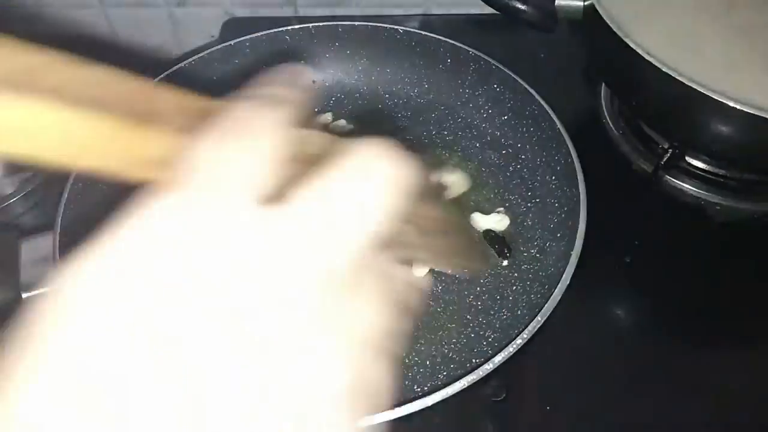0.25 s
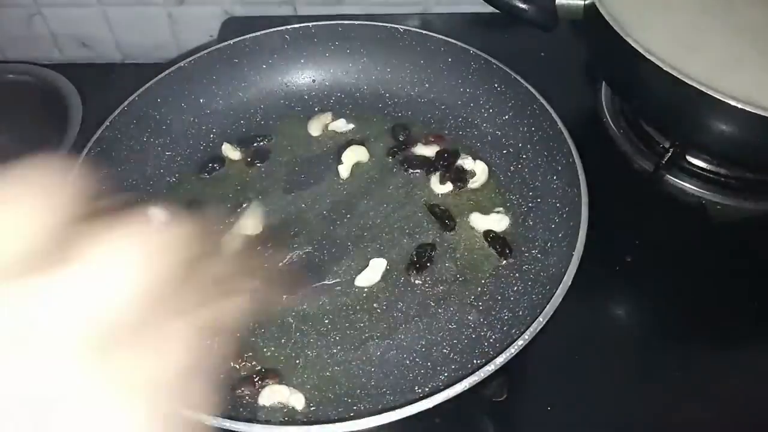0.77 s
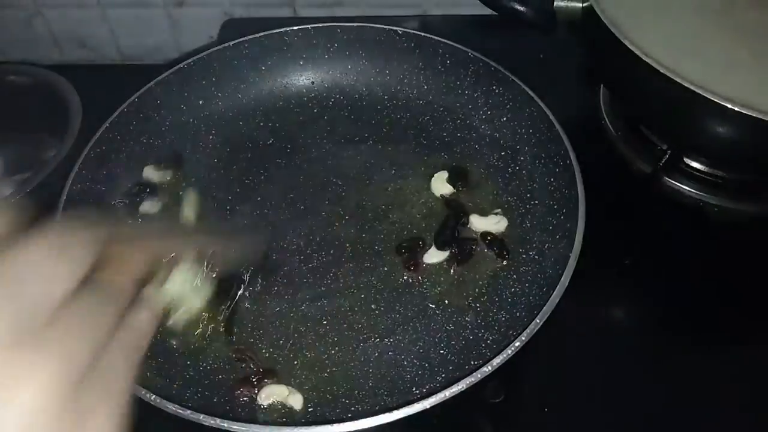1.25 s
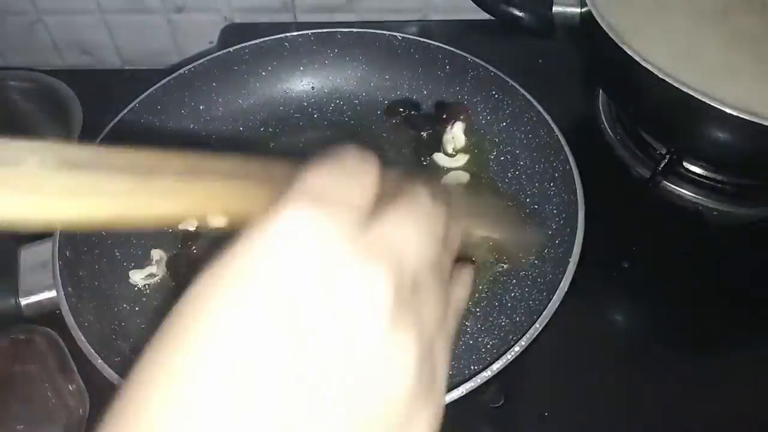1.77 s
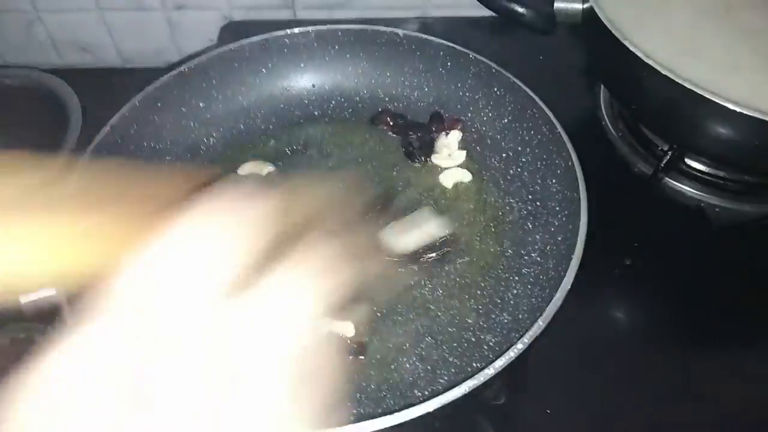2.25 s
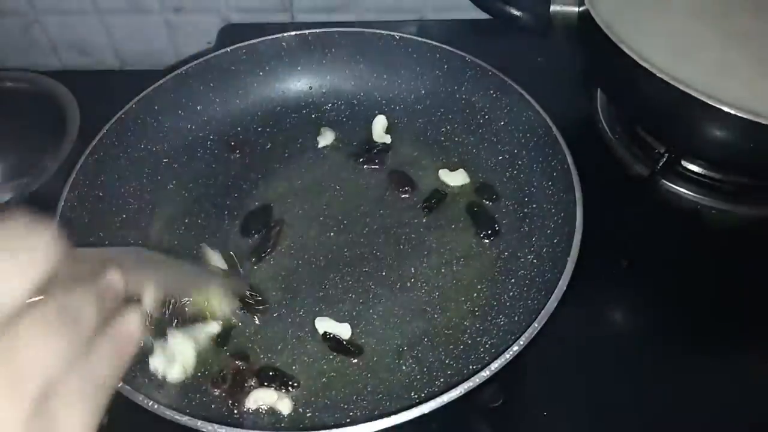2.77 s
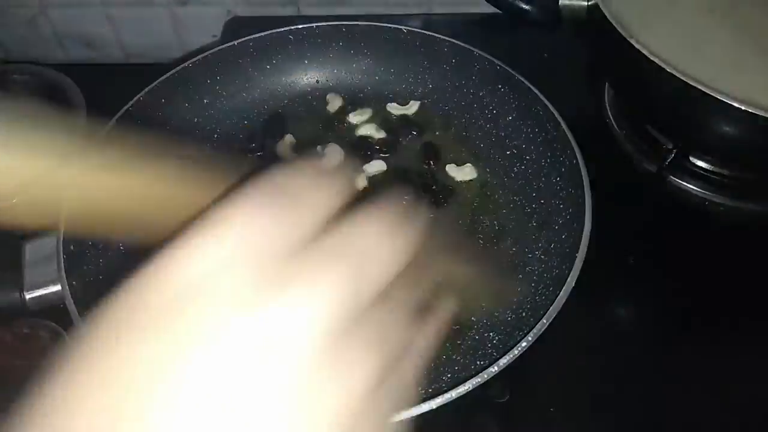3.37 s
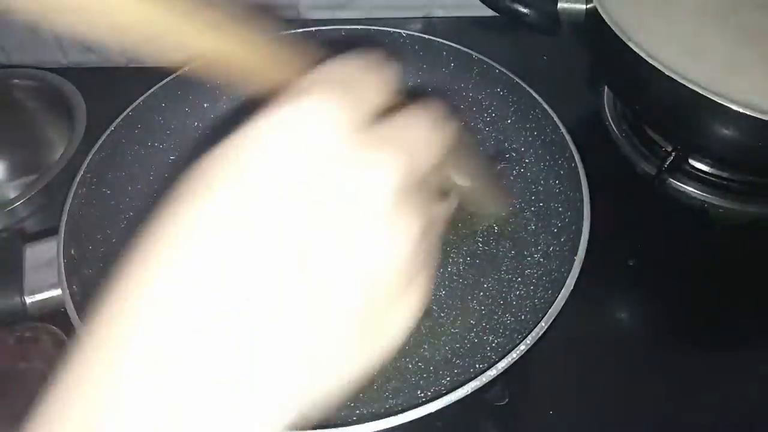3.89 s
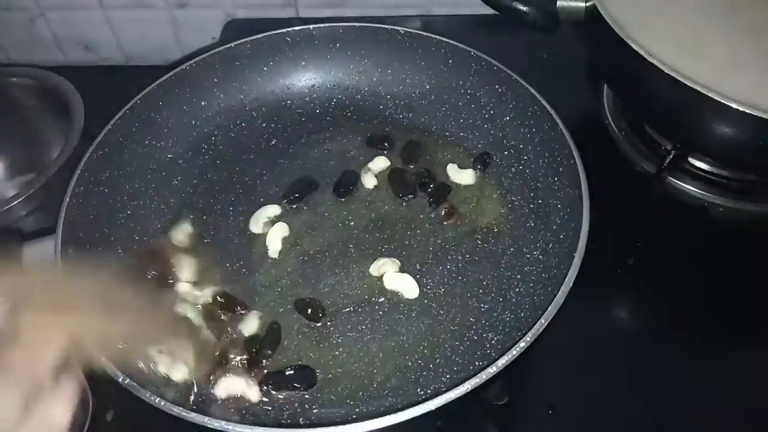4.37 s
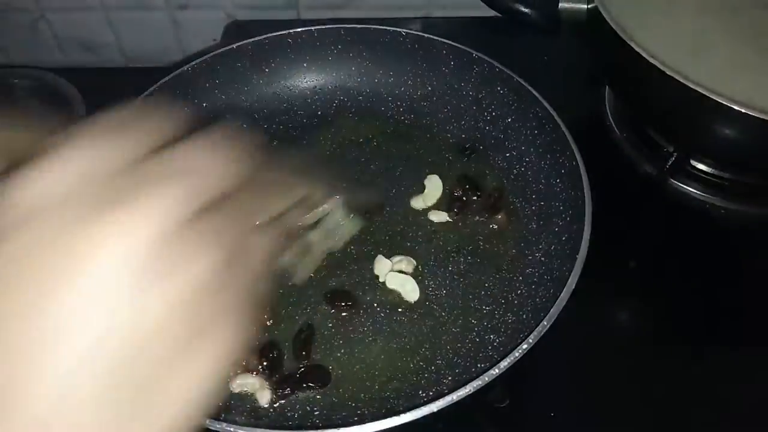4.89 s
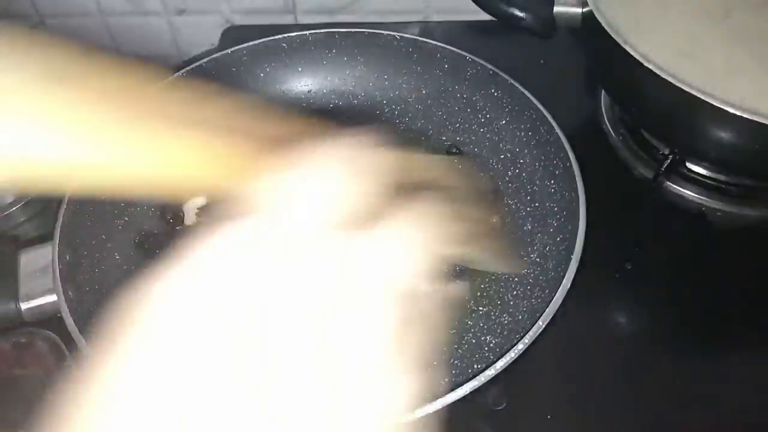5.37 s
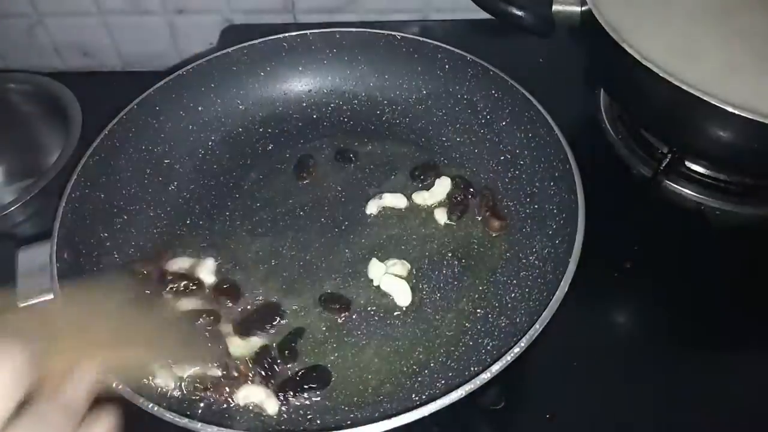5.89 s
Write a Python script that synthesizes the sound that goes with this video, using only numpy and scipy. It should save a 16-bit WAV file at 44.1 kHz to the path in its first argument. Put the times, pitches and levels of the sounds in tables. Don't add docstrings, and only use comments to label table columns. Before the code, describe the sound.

Close mono sound of nuts and raisins frying in hot fat: a continuous crisp crackle with loud bubble pops. Every half second or so a wooden spatula knocks the pan, giving short, low-mid, quickly damped clunks, followed by brief scrapes and rattling nuts. Stirring pauses around five seconds, then resumes with more knocks. A low burner hum and a small kitchen echo lie beneath.

```python
import sys
import numpy as np
from scipy import signal
from scipy.fft import rfft, irfft
from scipy.io import wavfile
from scipy.ndimage import uniform_filter1d

SR = 44100
rng = np.random.default_rng(int(sys.argv[2]) if len(sys.argv) > 2 else 0)


def materialize(psi):
    bounded = np.clip(np.atleast_2d(psi).T, -1, 1)
    quanta = np.round(bounded * 32767).astype(np.int16)
    wavfile.write(sys.argv[1], SR, quanta)


def volts_from_db(level):
    exponent = np.asarray(level, float) / 20
    return 10 ** exponent


N = 270774


def evened(x):
    return x / np.sqrt(np.mean(x ** 2) + 1e-20)


def read(points, hz):
    f, value = np.transpose(points)
    return np.interp(np.log(hz + 1), np.log(f + 1), value)


def add(mix, s, sound):
    part = mix[round(s * SR):][:len(sound)]
    part += sound[:len(part)]


def band(x, low_hz, high_hz):
    return signal.sosfilt(signal.butter(2, [low_hz, high_hz], "bandpass", fs=SR, output="sos"), x)


def drift(size):
    once = uniform_filter1d(rng.standard_normal(N), size=size)
    return evened(uniform_filter1d(once, size=size))


def click_of(points, size=4096, floor_db=-90):
    gain_db = np.maximum(read(points, abs(np.fft.fftfreq(size, 1 / SR))), floor_db)
    click = np.fft.ifft(np.exp(np.conj(signal.hilbert(np.log(volts_from_db(gain_db)))))).real
    return click[:size // 2] / abs(click).max()


def coloured(x, points):
    return evened(signal.oaconvolve(x, click_of(points))[:N])


def bursts(per_s, spread_db, clump_db):
    size = volts_from_db(spread_db * np.minimum(rng.exponential(1, N), 5)) * rng.choice([-1, 1], N)
    happens = rng.random(N) < per_s / SR
    return evened(size * happens * volts_from_db(clump_db * drift(500)))


def swells(s, db, held, rise, fall, rest_db=-120):
    t = np.arange(0, N / SR + .002, .001)[:, None]
    early, late = np.maximum(s - t, 0), np.maximum(t - s - np.abs(held), 0)
    each_db = db - rise * early - fall * late
    gain = np.sqrt((volts_from_db(each_db) ** 2).sum(1) + volts_from_db(rest_db) ** 2)
    return np.interp(np.arange(N) / SR, t[:, 0], gain)


def ringing(modes, free=1, spot_db=0, rise=1e-4):
    hz, db, t60 = np.transpose(modes)[:, :, None]
    t = np.arange(SR // 2) / SR
    partials = volts_from_db(db + spot_db - 60 * t / (t60 * free)) * np.sin(2 * np.pi * hz * t)
    return partials.sum(0) * (1 - np.exp(-t / rise))


# [f/Hz, level/dB]
HUM = [(20, -90), (60, -70), (100, -57), (200, -74), (270, -16), (310, -3.5), (410, -2.5), (560, -6),
       (800, -9.5), (1200, -11), (1600, -12), (3000, -71)]
# [t/s, shake of the stove top/dB, low rolling of the load/dB]
SHOVES = [(.07, -50, -59), (.43, -51, -36.5), (1.045, -50, -37.5), (1.8, -47, -38), (2.29, -48, -36),
          (3.0, -64, -38.5), (3.35, -59, -53), (4.0, -52, -32.5), (4.89, -46, -38), (5.47, -41, -39),
          (5.65, -61, -43), (6.0, -48, -64)]


def burner():
    noise = rng.standard_normal((2, N))
    roar = irfft(rfft(noise[0]) * volts_from_db(read(HUM, np.fft.rfftfreq(N, 1 / SR))), N)
    rumble = band(band(noise[1], 156, 290), 93, 197)
    s, shake_db, _ = np.transpose(SHOVES)
    shaking = swells(s, shake_db - 4.5, 0, rise=970, fall=190, rest_db=-72)
    return volts_from_db(-38.5) * evened(roar) + shaking * evened(rumble)


# [t/s, crackle level/dB, fine spray level against it/dB]
FRYING = [(0, -27.5, -24), (.2, -27.5, -20), (.31, -30, -23), (.52, -28, -21), (.9, -27.5, -21),
          (1.0, -29.5, -20.5), (1.3, -25, -21.5), (1.6, -27, -22), (2.0, -25.5, -21), (2.14, -29.5, -20.5),
          (2.62, -27, -21), (2.92, -29, -21.5), (3.45, -26, -18.5), (4.55, -25, -20.5), (4.73, -28, -19),
          (4.95, -24.5, -21), (5.45, -28.5, -20), (5.8, -24, -19.5)]
# [t/s, crackle level/dB, spray level/dB, seethe level/dB]
SPLASHES = [(.012, -44, -62, -56), (.146, -29, -53, -42), (.525, -26.5, -60, -55), (1.052, -32, -51, -50),
            (1.262, -27, -58, -34.5), (1.395, -46, -53, -54), (1.525, -23.5, -64, -57),
            (1.802, -37, -64, -37.5), (2.262, -22.5, -60, -37), (2.53, -42, -60, -49),
            (2.63, -40, -56, -45), (2.71, -45, -50, -43), (2.83, -28, -64, -43), (2.972, -30, -62, -48),
            (3.335, -28, -58, -46), (3.47, -25, -60, -55), (3.62, -39, -60, -42), (3.82, -40, -51, -61),
            (3.96, -27, -60, -55), (3.984, -31, -60, -41), (4.16, -27, -54, -35), (4.52, -39, -60, -55),
            (4.63, -25, -60, -47), (5.29, -25, -50, -58), (5.478, -28, -56, -37), (5.64, -24.5, -60, -57),
            (5.69, -25.5, -51, -38), (5.73, -44, -58, -36), (5.98, -32, -65, -55), (6.12, -71, -57, -42.5)]
# [f/Hz, level/dB]
CRACKLE = [(1530, -65), (2600, -20), (2720, -19.5), (3130, -22.5), (3550, -16), (3800, -8.5), (4900, -5),
           (5700, 0.5), (6560, -4), (7700, -26), (9000, -27), (11700, -54), (19800, -120)]
# [f/Hz, level/dB]
SPRAY = [(5000, -22), (7500, 4.5), (8600, 4.5), (10500, -2.5), (12000, -2), (13000, 2), (13200, -3),
         (13900, -4), (14400, 4), (15000, 8.5), (15700, 6), (17000, -80)]
# [f/Hz, level/dB]
SEETHE = [(530, -27.5), (900, 0), (1150, -11.5), (1710, -2.5), (1860, -3), (2020, -1.5), (2960, -8),
          (3600, -4), (4680, -21.5), (7920, -120)]


def frying():
    s, *controls = np.transpose(FRYING)
    vigour_db, fine_db = (np.interp(np.arange(N) / SR, s, c) for c in controls)
    seethe_db = -41.5 + 0.18 * (vigour_db + 20)
    steady_db = (vigour_db, vigour_db + fine_db - 6.0, seethe_db)
    s, *splash_db = np.transpose(SPLASHES)
    crackling, spraying, seething = (np.hypot(volts_from_db(steady), swells(s, db, 0, rise=250, fall=127))
                                     for steady, db in zip(steady_db, splash_db))
    swarm = bursts(per_s=7500, spread_db=-2.5, clump_db=0.6)
    shared = 1.08 * swarm + 0.46 * bursts(per_s=5400, spread_db=4.0, clump_db=-1.0)
    fine = np.zeros(N)
    for low_hz, high_hz in [(5000, 10500), (10500, 13700), (13700, 20000)]:
        own = bursts(per_s=4300, spread_db=0.5, clump_db=2.5)
        fine += band(shared + own, low_hz, high_hz)
    dull = swarm + bursts(per_s=2000, spread_db=1.5, clump_db=-0.5)
    crackle = crackling * coloured(swarm, CRACKLE)
    spray = spraying * volts_from_db(7.0) * coloured(fine, SPRAY)
    return crackle + spray + seething * volts_from_db(1.5) * coloured(dull, SEETHE)


# [f/Hz, variation/dB]
PATCHY_DB = [(300, 1.5), (1000, 2.3), (3000, 2.1), (4000, .9), (15000, 1.2)]


def patchy(x):
    hz, _, z = signal.stft(x, SR, nperseg=512)
    field = uniform_filter1d(rng.standard_normal(z.shape), size=7, axis=0)
    field = uniform_filter1d(field, size=18, axis=1)
    gain = volts_from_db(read(PATCHY_DB, hz)[:, None] * evened(field))
    return signal.istft(z * gain, nperseg=512)[1][:N]


# [t/s, pressure level/dB, held/s, brightness/dB]
STROKES = [(0, -43, 0.079, -8), (.125, -47.5, 0.066, 2), (.2, -36, 0.015, -14), (.36, -60, 0.042, -11),
           (.458, -32.5, 0.023, -8), (.5, -36.5, 0.046, -4.5), (.62, -66, .4, -7), (1.2, -56, 0.092, 8.5),
           (2.165, -41, 0.037, -7), (2.29, -30, 0.012, -5), (2.33, -52, .02, 0), (3.0, -56, .35, 1),
           (3.42, -43.5, 0.021, 6), (3.47, -38.5, 0.042, 0), (3.515, -49, 0.052, 2.5),
           (4.05, -33.5, 0.095, -8), (4.12, -38, 0.2, -13), (5.58, -33, 0.094, -12), (5.69, -47, 0.04, 8),
           (5.75, -35, 0.036, -8.5)]
# [f/Hz, level/dB, time to fall 60 dB/s]
LOWEST = [(311, -6, .3), (400, -3, .14), (480, -6, .1), (550, -6, .1)]
LOWER = [(585, -12, .1), (630, 0, .26), (660, -1, .22)]
MAIN = [(688, -10, .13), (715, 0, .3), (748, -11, .11)]
UPPER = [(872, -2, .25), (925, 0, .2)]
RIM = [(990, 0, .07), (1030, -4, .06), (1155, -6, .08), (1212, -3, .15), (1328, -2, .27), (1355, -4, .12),
       (1400, -6, .08), (1445, -8, .08)]
# [f/Hz, level/dB, time to fall 60 dB/s]
FLOOR = [(1480, -2, .34), (1720, -5, .15), (1990, -2, .1), (2190, 1, .1), (2600, -4, .07), (2880, -3, .05)]
# [f/Hz, level/dB]
WOOD = [(250, -38.5), (450, 11), (700, 12), (1300, 8.5), (2000, 2.5), (2800, -3), (6000, -37), (9000, -97)]


def scrape():
    s, db, held, bright_db = np.transpose(STROKES)
    pressing = swells(s, db, held, rise=240, fall=750, rest_db=-91)
    rasping = swells(s, db + bright_db, held, rise=240, fall=750, rest_db=-115)
    s, _, roll_db = np.transpose(SHOVES)
    rolling = swells(s + 0.027, roll_db, 0, rise=71, fall=33, rest_db=-50)
    slips = bursts(per_s=2500, spread_db=2.5, clump_db=1.2)
    body = ringing(MAIN, .22) + volts_from_db(-13) * ringing(LOWER + UPPER, .25)
    low, main, upper = (evened(signal.oaconvolve(slips, ring)[:N])
                        for ring in (ringing(LOWEST, 0.99), body, ringing(RIM + FLOOR, .45)))
    bright = upper + volts_from_db(3.0) * coloured(slips, WOOD)
    return rolling * low + pressing * main + rasping * bright


# [t/s, loss/dB]
CHOKES = [(.05, 8), (.183, 5), (.25, 12), (.495, 9), (.74, 8), (1.066, 2), (1.08, 4), (1.113, 4),
          (1.13, 11), (1.84, 4), (1.865, 2), (1.95, 8), (2.19, 6), (2.259, 11), (2.316, 16), (3.1, 8),
          (3.372, 3), (3.385, 5), (3.43, 10), (3.57, 10), (3.997, 6), (4.06, 7), (4.115, 9), (5.482, 2),
          (5.497, 8), (5.53, 5), (5.556, 11), (5.677, 14)]


def choking(s, size):
    touches = [c for c in CHOKES if s < c[0] < s + .3] + [(s, 0)]
    at, loss_db = np.transpose(touches)[:, :, None]
    t = s + np.arange(size) / SR
    settled = np.clip((t - at) / .006, 0, 1)
    return volts_from_db(-(np.abs(loss_db) * settled).sum(0))


# [t/s, peak level/dB, lower notes/dB, upper notes/dB, rim notes/dB]
KNOCKS = [(0.016, -25.5, 0, 7, -10), (.122, -23, -10, -12, -19), (.14, -35, -10, -13, -8),
          (0.164, -18, -18, -5, -8), (.2, -37, -15, 6, -17), (0.418, -22, 7, 10.5, -1),
          (0.423, -12.5, -2.5, -4, -9), (.449, -33, -5, -1, 15), (.466, -40, 25, -4, 0),
          (0.697, -28, -20, 3, -14), (1.051, -4.5, -8.5, -14, -15.5), (1.058, -40, -7, -15, -17),
          (1.795, -3.5, -7, -16, -10.5), (1.803, -26, -4, -5, 11), (1.826, -17, -6, -20, 1),
          (1.879, -35, -8, -17, 9), (2.16, -26, -1, 5, -14), (2.2445, -9.5, -16, 0, -0.5),
          (2.251, -20, 2, 8, -27), (2.264, -16.5, -16, -7, -25), (2.284, -30.5, -10, -12, 10),
          (2.293, -12, -23, -25, -17), (2.972, -33, 11, 15.5, 4), (3.021, -39.5, 18, 13, 8),
          (3.3365, -6.5, -3, -27, -10.5), (3.344, -24, -6, 5, -12), (3.374, -31.5, 20, -14, 13.5),
          (3.41, -39, -4, -20, -17), (3.52, -24, -14, -18, -14), (3.98, -3, -11, -17, -11.5),
          (3.986, -17, -18, -26, -21), (4.019, -18.5, 6.5, -4, -4), (4.098, -45, -11, -15, -9),
          (5.466, -17.5, -12, 0, 1.5), (5.473, -8, -17, -15, -19), (5.511, -36, 13, -20, 15.5),
          (5.658, -21.5, -19, -20, -5), (5.723, -35, -20, 9, -12)]
# [f/Hz, level/dB, time to fall 60 dB/s]
THUMP = [(256, 0, .1)]
# [t/s, f/Hz]
LOADED = [
    (.15, 715),
    (.42, 723),
    (1.05, 721),
    (1.8, 713),
    (2.25, 707),
    (2.3, 716),
    (3.34, 718),
    (3.98, 703),
    (5.47, 721),
]


def knocks():
    out, t = np.zeros(N), np.arange(4000) / SR
    grain = rng.standard_normal((len(KNOCKS), 2, len(t)))
    spots = 2 * rng.standard_normal((len(KNOCKS), len(RIM), 1))
    rattle_shape = (1 - np.exp(-t / 0.00011)) * volts_from_db(-60 * t / .085)
    wood = click_of(WOOD)
    for (s, db, lower_db, upper_db, rim_db), rough, spot in zip(KNOCKS, grain, spots):
        force = .07 * rough[0] * np.exp(-t / .003)
        force[:12] += 1.5 * np.hanning(12)
        bend = np.interp(s, *np.transpose(LOADED)) / MAIN[1][0]
        main = np.array(MAIN) * [bend, 1, 1]
        # notes, level in dB, time to build up in s
        parts = [(main, 0, .004), (LOWEST, -14, .006), (THUMP, -19, .004), (LOWER, lower_db - 4, .003),
                 (UPPER, upper_db - 2.0, .002), (RIM, rim_db + 4.5, .0005)]
        for family, share_db, rise in parts:
            ring = signal.fftconvolve(ringing(family, .8, spot[:len(family)], rise), force)
            left = choking(s, len(ring)) ** (0.73 if family is RIM else 1)
            add(out, s, volts_from_db(db + share_db - 2.0) * left * ring / abs(ring).max())
        rattle = signal.fftconvolve(rough[1] * rattle_shape, wood)
        add(out, s, volts_from_db(db + rim_db - 1) * rattle / abs(rattle).max())
    return out


# [t/s, peak level/dB, off-centre tilt/dB]
FLOOR_TAPS = [(0.016, -5.5, 12), (1.796, -21, -2), (2.161, -12, 0), (2.245, 5, -3), (2.972, -3, 8.5),
              (3.012, -11, 5), (3.41, -18, 0), (3.495, -6, 3), (3.019, -23, 3), (3.337, -14, -6),
              (5.465, -13, -7), (5.659, -12, 6), (5.71, -17, 5), (5.724, -7, -2), (3.981, -23, 3),
              (2.264, -12, -8)]
OFF_CENTRE = [0, 1, -1, -1, 1, 0]


def taps():
    out = np.zeros(N)
    for s, db, off_db in FLOOR_TAPS:
        ring = np.convolve(ringing(FLOOR, .5, off_db * np.c_[OFF_CENTRE], .0002), np.hanning(8))
        add(out, s, volts_from_db(db - 16.0) * ring / abs(ring).max())
    return out


# [t/s, level/dB, held/s]
ROCKING = [(.05, -28.5, 0.012), (.115, -34.5, 0.11), (.295, -38, .02), (.61, -33, 0.018),
           (0.428, -23, .145), (.7, -34, 0.088), (1.091, -28, 0.089), (1.19, -35.5, 0.11),
           (1.73, -34, .005), (1.812, -22.5, 0.039), (1.91, -32, .03), (2.07, -31, .005),
           (2.177, -30, 0.067), (2.26, -27.5, 0.12), (2.75, -37, 0.016), (2.984, -27, 0.0084),
           (3.019, -22.5, 0.025), (3.08, -29, 0.017), (3.12, -33, 0.092), (3.36, -28, 0.1), (3.5, -39, 0.2),
           (3.73, -32, 0.016), (4.005, -23, 0.03), (4.08, -31, .03), (4.29, -33, .01), (4.45, -42, 0.079),
           (5.35, -34, .005), (5.501, -22, 0.031), (5.62, -31, 0.045), (5.74, -36.5, 0.017),
           (6.001, -35, 0.011)]


def rocking():
    phase = 2 * np.pi * np.cumsum(311 * (1 + .011 * drift(1500))) / SR
    return swells(*np.transpose(ROCKING), rise=2400, fall=340, rest_db=-62) * np.sin(phase)


# [t/s, peak level/dB, f/Hz]
POPS = [(.2618, -11, 5600), (.3457, -10, 6100), (.409, -12, 6150), (.415, -11, 6300), (.5121, -2, 5800),
        (.529, -9, 6200), (.7448, -5, 6100), (1.0467, -5, 5850), (1.2544, -9, 5100), (1.7495, -7, 5700),
        (1.7978, -5, 6200), (1.7994, 0, 4400), (1.802, -4, 5800), (1.8074, -5, 5950), (1.9021, -2, 5350),
        (1.9535, -2, 5350), (1.9586, 9.5, 5400), (1.9606, -1, 5800), (2.2463, -6, 5350), (2.2622, -8, 5800),
        (2.974, -10, 4830), (3.2188, -2, 5600), (3.3365, -6, 5850), (3.4152, -7, 6300), (4.6287, 5, 4300),
        (5.4719, -7, 5700), (5.5388, -9, 5540), (5.7565, -5, 4800), (5.9438, -3, 5700), (6.1232, 11, 5700)]
# [t/s, peak level/dB, f/Hz]
SPITS = [(1.047, -38, 10000), (1.1114, -39, 14600), (1.3813, -38, 9000), (1.399, -27, 14900),
         (1.605, -42, 11200), (1.7928, -48, 15300), (1.8058, -47, 14900), (1.9586, -34, 11500),
         (2.5905, -45, 15200), (2.6983, -46, 15300), (2.9522, -45, 15500), (3.3992, -42, 15000),
         (3.5114, -44, 15500), (4.0567, -45, 15000), (4.2941, -47, 15050), (4.721, -43, 10000),
         (4.9641, -43, 11500), (5.0888, -44, 15100), (5.4839, -45, 15400), (5.6545, -41, 15500),
         (5.9633, -41, 14700), (6.123, -36, 7840)]


def pops():
    out, t = np.zeros(N), np.arange(300) / SR
    click, spit = click_of(CRACKLE, floor_db=-46)[:400], click_of(SPRAY)[:400]
    dying = volts_from_db(-60 * t / .002)
    for (s, db, hz), sign in zip(POPS, rng.choice([-1, 1], len(POPS))):
        ring = dying * np.cos(2 * np.pi * hz * t)
        ring[0] += 1.5
        pop = np.convolve(click, ring)
        pop = sign * volts_from_db(db - 8) * pop / abs(pop).max()
        for late, share in ((.0003, 1), (.0011, .3), (.0017, .15), (.0024, -.1), (.0038, .12)):
            add(out, s + late, share * pop)
    for s, db, hz in SPITS:
        drop = np.convolve(spit, dying * np.cos(2 * np.pi * hz * t))
        drop = volts_from_db(db + 15.5) * drop / abs(drop).max()
        for late, share in ((.0002, 1), (.0014, .45), (.0026, -.3)):
            add(out, s + late, share * drop)
    return out


# [f/Hz, time to fall 60 dB/s]
KITCHEN = [(300, 0.3), (1000, 0.66), (5000, 0.13), (15000, 0.058)]


def kitchen(x):
    echoes = np.zeros(SR // 2)
    at = np.arange(200, SR // 2 - 20, 20)
    echoes[at + rng.integers(0, 20, len(at))] = rng.choice([-1., 1.], len(at))
    hz, t, z = signal.stft(echoes, SR, nperseg=256)
    t60 = np.maximum(read(KITCHEN, hz), .02)[:, None]
    tail = signal.istft(z * volts_from_db(-60 * t / t60), SR, nperseg=256)[1]
    return signal.oaconvolve(x, tail / np.linalg.norm(tail))[:N]


def scene():
    fat, popping = frying(), pops()
    no_bass = signal.butter(5, 230, "highpass", fs=SR, output="sos")
    pan = signal.sosfilt(no_bass, knocks() + taps() + scrape())
    echo = kitchen(volts_from_db(-17.0) * (fat + popping) + volts_from_db(-21) * pan)
    mono = band(popping + pan + echo + rocking() + patchy(fat + burner()), 50, 20000)
    return np.array([mono, mono])


def low_pass(x):
    return signal.sosfilt(signal.butter(12, 17100, fs=SR, output="sos"), x)


def record(dry):
    clipped = np.clip(dry, -.92, .92)
    edge = signal.firwin(1023, 15790, window=("kaiser", 10), fs=SR)  # low-pass, Hz
    mix = signal.oaconvolve(clipped, edge[None], "same")
    return low_pass(mix)


dry = scene()
out = record(dry)
materialize(out)
```